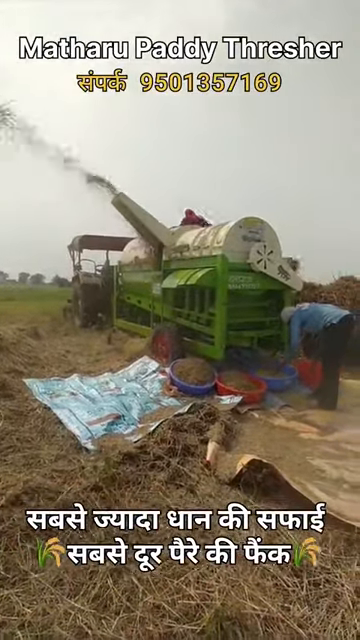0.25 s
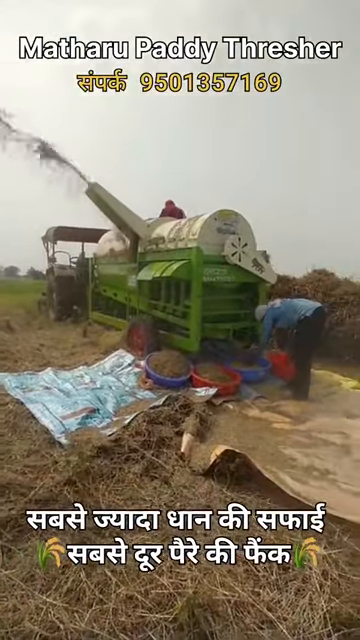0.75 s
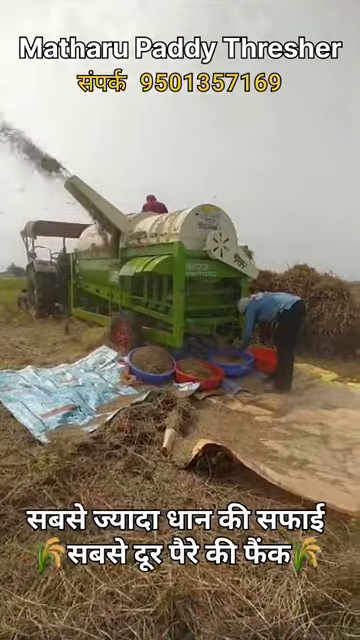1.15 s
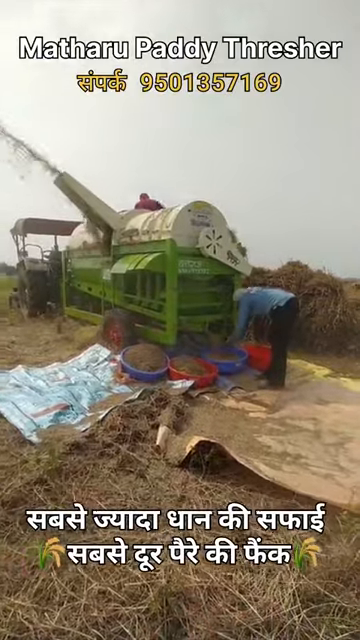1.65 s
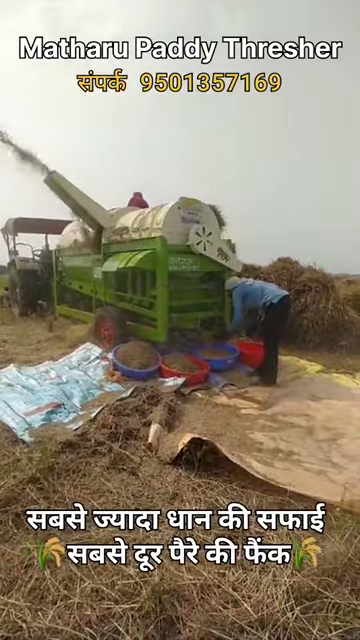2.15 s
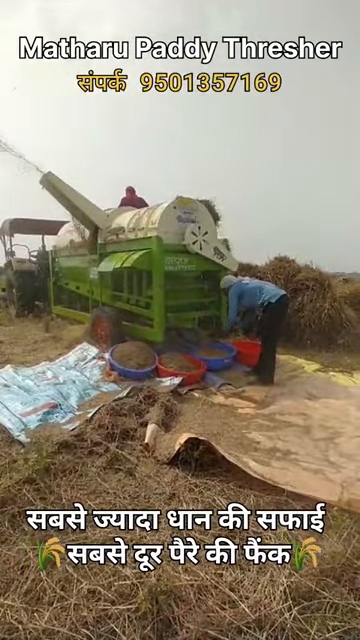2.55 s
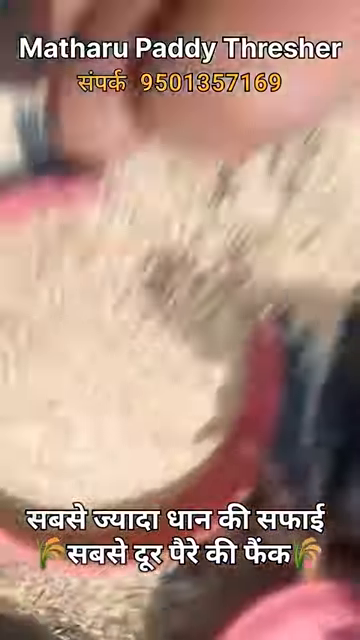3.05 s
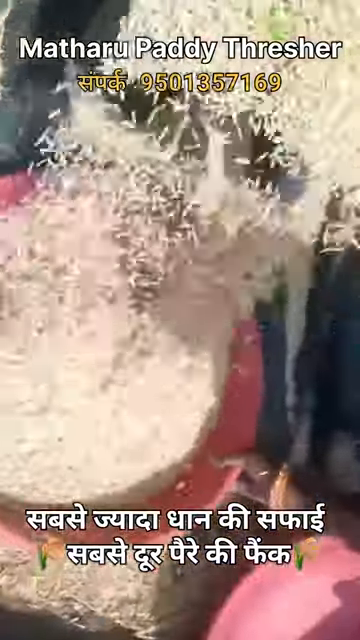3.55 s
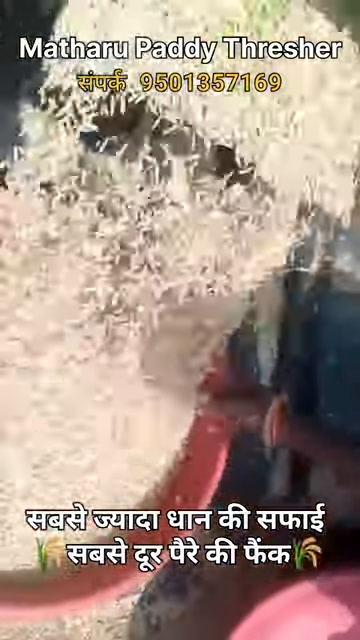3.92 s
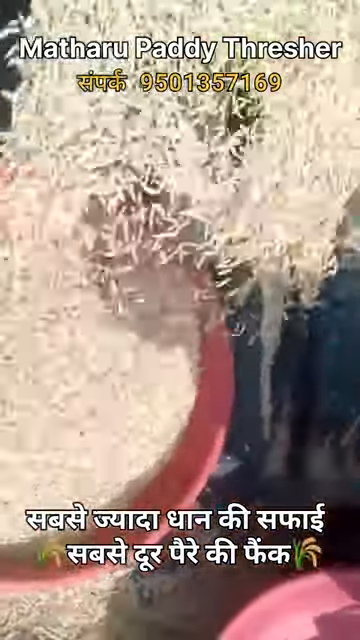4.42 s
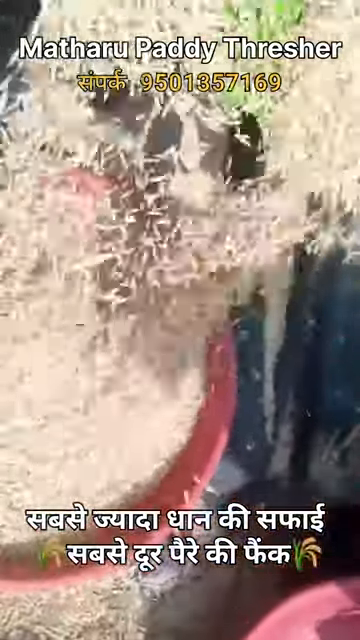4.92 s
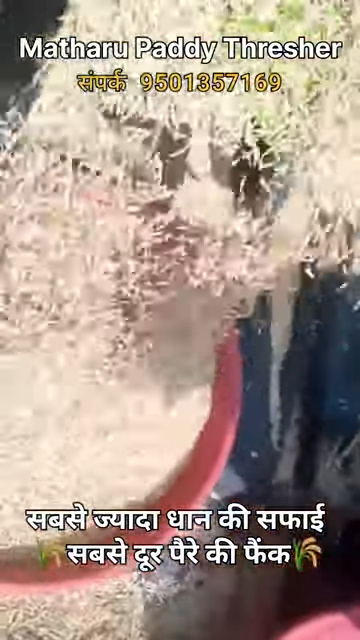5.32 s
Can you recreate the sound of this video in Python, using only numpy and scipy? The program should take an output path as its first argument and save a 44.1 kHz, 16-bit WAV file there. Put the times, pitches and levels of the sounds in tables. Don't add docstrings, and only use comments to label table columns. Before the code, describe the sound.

Loud steady farm machine roar with engine drone, metallic knocks and hiss for three seconds, then a sudden drop to soft sheet-metal rattle and grain hiss.

```python
import sys
import numpy as np
from scipy import signal
from scipy.fft import rfft, irfft
from scipy.io import wavfile
from scipy.ndimage import uniform_filter1d

SR = 44100
rng = np.random.default_rng(int(sys.argv[2]) if len(sys.argv) > 2 else 0)


def transcribe(u):
    v = np.clip(np.atleast_2d(u).T, -1, 1)
    q = np.round(v * 32767).astype(np.int16)
    wavfile.write(sys.argv[1], SR, q)


def voltage_ratio(decibels):
    exponent = np.asarray(decibels, float) / 20
    return 10 ** exponent


N = 246078
TIME_S = np.arange(N) / SR
CUT_S = 3.0243


def evened(x):
    return x / np.sqrt(np.mean(x ** 2) + 1e-20)


def curve(rows, col=1):
    rows = np.array(rows)
    return np.interp(TIME_S, rows[:, 0], rows[:, col])


def read(points, hz):
    f, value = np.transpose(points)
    return np.interp(np.log(hz + 1), np.log(f + 1), value)


def bumps(table, hz):
    return sum(db / (1 + (2 * (hz - f) / width) ** 2) for f, width, db in table)


def slow(hz):
    step = 64
    spectrum = rfft(rng.standard_normal(4096))
    spectrum = spectrum * np.exp(-(np.fft.rfftfreq(4096, step / SR) / hz) ** 2)
    return np.interp(np.arange(N) / step, np.arange(4096), evened(irfft(spectrum)))


def coloured(x, gain, patchy_db, flicker_db):
    hz, t, z = signal.stft(x, SR, nperseg=1024)
    patches = rng.standard_normal((len(t), len(hz))).T
    patches = uniform_filter1d(patches, size=12, axis=0)
    patches = evened(uniform_filter1d(patches, size=6, axis=1))
    flicker = rng.standard_normal(len(t))
    z = z * gain(hz)[:, None] * voltage_ratio(patchy_db * patches + flicker_db * flicker)
    return evened(signal.istft(z, SR, nperseg=1024)[1][:N])


def orders(turn_hz, table, waver_db, drift, waver_hz):
    angle = 2 * np.pi * np.cumsum(turn_hz) / SR
    out = np.zeros(N)
    for multiple, db in table:
        half_turns = round(2 * multiple)
        level = np.sqrt(2) * voltage_ratio(db + waver_db * slow(waver_hz))
        phase = 2 * np.pi * rng.random() + drift * slow(waver_hz)
        out += level * np.sin(half_turns / 2 * angle + phase)
    return out


# time_s, load_db (above the usual)
STRAW_LOAD = [
    (0.0, .3),
    (0.68, -1),
    (0.9, 0.9),
    (1.33, 1.2),
    (1.62, -1),
    (1.87, -2),
    (2.1, 0.25),
    (2.42, 1),
    (3.02, -1),
]


def loaded(level_db, share, gust_db):
    return voltage_ratio(level_db + share * curve(STRAW_LOAD) + gust_db * slow(3.9))


# time_s, crank_hz
CRANK_WIDE = [
    (0.0, 33.4),
    (1.67, 33.23),
    (2.33, 33.2),
    (2.5, 32.04),
    (3.02, 32.12),
]
# frequency_hz, level_db (per Hz)
ROAR_SPECTRUM = [(24, -50), (40, -33.5), (118, -12), (259, -13), (297, -9), (384, -11), (640, -7),
                 (860, -11), (1180, -14.5), (1490, -15.5), (2130, -17.5), (2340, -23), (2590, -15),
                 (3150, -18.5), (4400, -36.5), (5720, -56), (9680, -120)]
# frequency_hz, width_hz, gain_db
REFLECTIONS = [(124, 62, 3.5), (217, 50, 3.5), (256, 29, -2), (859, 88, -13.5), (1168, 30, 3),
               (1510, 165, -4), (1770, 30, 3.5), (1860, 58, -12.5), (2385, 120, -2.5), (2863, 230, -8.5),
               (3500, 150, -4.5)]


def roar():
    gain = lambda hz: voltage_ratio(read(ROAR_SPECTRUM, hz) + bumps(REFLECTIONS, hz))
    stroke = 1 + 0.032 * np.cos(np.pi / 2 * np.cumsum(curve(CRANK_WIDE)) / SR + 2.1)
    noise = coloured(rng.standard_normal(N), gain, patchy_db=0.96, flicker_db=0.63)
    return loaded(level_db=-28, share=0.85, gust_db=0.71) * stroke * noise


# multiple, level_db (rms)
CRANK_TONES = [(2, -40.5), (3, -36), (4, -34.5), (5, -38.5), (6, -46), (6.5, -46.5), (7, -42), (9, -45.5),
               (10, -46), (10.5, -49.5)]
BLOWER_TONES = [(2, -53), (3, -49), (4, -31.5), (5, -43), (6, -46.5), (7, -45.5), (8, -50.5), (12, -50.5)]


def drive():
    crank_hz = curve(CRANK_WIDE)
    blower_hz = 0.868 * crank_hz
    drone = orders(crank_hz, CRANK_TONES, waver_db=0.84, drift=0.45, waver_hz=7.1)
    drone += orders(blower_hz, BLOWER_TONES, waver_db=2.2, drift=0.52, waver_hz=5.7)
    return loaded(level_db=-0.29, share=-0.1, gust_db=0.51) * drone


# time_s, peak_db, low_db (low part relative to high)
ROD_KNOCKS = [(0.0548, -22, -5), (0.1506, -31, -9), (0.177, -27, 1), (0.3269, -25, -4), (0.5186, -34, 1),
              (0.7843, -22.5, 1), (0.8644, -31, 3), (0.907, -19, 0), (0.9976, -29, -8), (1.0295, -25, -14),
              (1.15, -23, 0.5), (1.272, -21.5, -2), (1.388, -24.5, -2), (1.509, -28, -1), (1.759, -31, 0),
              (1.9393, -27.5, -1), (1.9919, -23, -6), (2.1148, -25.5, -3), (2.358, -23, 1), (2.384, -28, 3),
              (2.4094, -34, 6), (2.7923, -34, -11), (2.95, -25, -12)]


def ringing(low_hz, high_hz, t):
    hz = rng.uniform(low_hz, high_hz, (40, 1))
    level = voltage_ratio(1.9 * rng.standard_normal(hz.shape))
    return evened((level * np.sin(2 * np.pi * (hz * t + rng.random(hz.shape)))).sum(0))


def clanks():
    out, t = np.zeros(N + 4000), np.arange(4000) / SR
    t60_s = 0.076
    for start_s, db, low_db in ROD_KNOCKS:
        shape = np.minimum(t / 0.01, 1) ** 2 * voltage_ratio(-60 * np.maximum(t - 0.009, 0) / t60_s)
        shape = shape + 0.046 * np.roll(shape, rng.integers(500, 1100))
        ring = ringing(5500, 7900, t) + voltage_ratio(low_db) * ringing(2600, 5500, t)
        start = max(round((start_s - 0.007) * SR), 0)
        out[start:][:len(t)] += voltage_ratio(db - 10) * shape * ring
    return out[:N]


# frequency_hz, level_db
PANEL_SPECTRUM = [(2120, -17), (3600, 0), (4140, -15), (4680, -2), (5330, -5.5), (6700, -1), (7500, -5.5),
                  (8230, -18), (9930, -26), (11000, -18), (14300, -50), (22000, -120)]


def clatter():
    strength = voltage_ratio(np.minimum(rng.exponential(1, N), 5))
    hits = strength * (rng.random(N) < 0.3) * rng.standard_normal(N)
    angle = 2 * np.pi * np.cumsum(curve(CRANK_WIDE)) / SR
    throb = 1 + 0.076 * np.cos(angle / 4 + 2.0) + 0.044 * np.cos(angle / 2 + 0.25)
    body = coloured(hits, lambda hz: voltage_ratio(read(PANEL_SPECTRUM, hz)), patchy_db=1.5, flicker_db=0.8)
    return loaded(level_db=-40, share=0.75, gust_db=0.37) * throb * body


# frequency_hz, level_db
CHAFF_SPECTRUM = [(5000, -8.5), (8500, -8), (10500, -10), (12600, -1.5), (13300, 0), (14900, -2.5),
                  (15600, -11.5)]


def chaff():
    hiss = coloured(rng.standard_normal(N), lambda hz: voltage_ratio(read(CHAFF_SPECTRUM, hz)),
                    patchy_db=1.3, flicker_db=0.5)
    return loaded(level_db=-40.5, share=0.5, gust_db=0.4) * hiss


# time_s, shaft_hz, rattle_db
OUTLET_SHAFT = [
    (3.03, 27.88, -47),
    (3.7, 28.51, -47.5),
    (4.15, 27.53, -48.2),
    (4.4, 28.02, -47.5),
    (4.8, 28.83, -47),
    (5.12, 28.86, -46.5),
    (5.58, 28.32, -47),
]
# frequency_hz, level_db (per Hz)
RATTLE_SPECTRUM = [(15, -65), (25, -28), (54, -9), (190, -11.5), (258, -6), (334, -9.5), (444, -6),
                   (589, -16), (1040, -13), (1340, -0.5), (1510, -7), (2260, -13.5), (3370, -24),
                   (4070, -20.5), (7000, -38), (9100, -66), (15400, -120)]
# frequency_hz, width_hz, gain_db
SHEET_PEAKS = [(1290, 280, 1), (2050, 350, 5.5), (2360, 63, 2.5), (2820, 55, 5), (3180, 400, 0),
               (3980, 270, 6), (5560, 330, 8.5)]
# frequency_hz, level_db (rms)
SHEET_MODES = [(1132, -59), (1158, -63), (1213, -59), (1242, -61), (1340, -60), (1446, -62), (1267, -59),
               (1305, -59), (1389, -53), (1507, -63), (1650, -64), (1825, -65), (2175, -68), (2285, -67),
               (2417, -71)]


def rattle():
    turns = np.cumsum(curve(OUTLET_SHAFT)) / SR
    fresh = rng.standard_normal((int(turns[-1]) + 2, 1560))
    pattern = signal.lfilter([1], [1, -0.65], fresh, axis=0)
    x = pattern[turns.astype(int), (turns % 1 * fresh.shape[1]).astype(int)]
    x = x * (1 + 0.1 * np.cos(2 * np.pi * turns + 1.14) + 0.033 * np.cos(4 * np.pi * turns + 2.1))
    gain = lambda hz: voltage_ratio(read(RATTLE_SPECTRUM, hz) + bumps(SHEET_PEAKS, hz))
    body = coloured(x, gain, patchy_db=1.1, flicker_db=0.3)
    rings = np.zeros(N)
    for hz, db in SHEET_MODES:
        level = voltage_ratio(db + 2.5 * slow(6))
        rings += level * np.sin(2 * np.pi * hz * TIME_S + 0.8 * slow(4))
    level_db = curve(OUTLET_SHAFT, col=2)
    return voltage_ratio(level_db + 5.0) * body + voltage_ratio(level_db + 49) * rings


# time_s, firing_hz
OUTLET_FIRING = [
    (3.03, 63.7),
    (4.32, 64.6),
    (4.54, 64.6),
    (4.65, 65.5),
    (5.47, 65.15),
    (5.58, 63.76),
]
# multiple, level_db (rms)
HUM_TONES = [(1, -74), (2, -52), (3, -60), (4, -63.5), (5, -69.5)]
OUTLET_SHAFT_TONES = [(2, -69), (3, -71), (8, -62)]


def hum():
    crank_hz = curve(OUTLET_FIRING) / 2
    out = orders(crank_hz, HUM_TONES, waver_db=0.5, drift=0.26, waver_hz=5.1)
    out += orders(curve(OUTLET_SHAFT), OUTLET_SHAFT_TONES, waver_db=3.0, drift=0.27, waver_hz=2.0)
    return out


# middle_s, half_length_s, level_db (rms)
DRUMMING_SWELLS = [
    (3.16, .04, -53),
    (3.45, 0.17, -52),
    (3.834, 0.07, -53),
    (4.196, .04, -58),
    (4.6, 0.17, -52.5),
    (4.953, 0.09, -61),
    (5.451, .15, -58),
]
# start_s, end_s, start_hz, end_hz, level_db (rms)
CHUTE_TONES = [
    (3.03, 3.498, 496, 501, -59),
    (3.3, 3.8, 392, 402, -65),
    (3.75, 4.5, 302.7, 304, -59),
    (3.86, 4.7, 439.3, 451, -56.5),
    (4.403, 5.3, 398, 405.5, -57.5),
    (4.651, 5.552, 376.3, 369.5, -59.5),
    (4.101, 4.6, 497, 499, -64),
    (5.15, 5.601, 316, 311.7, -66),
]


def chute():
    swell = voltage_ratio(-63.5)
    for middle_s, half_s, db in DRUMMING_SWELLS:
        swell = swell + voltage_ratio(db) * np.exp(-((TIME_S - middle_s) / half_s) ** 2)
    swell = swell * voltage_ratio(3.5 * slow(16))
    out = swell * np.sin(2 * np.pi * 9 * np.cumsum(curve(OUTLET_SHAFT)) / SR)
    for start_s, end_s, start_hz, end_hz, db in CHUTE_TONES:
        along = np.clip((TIME_S - start_s) / (end_s - start_s), 0, 1)
        hz = start_hz + (end_hz - start_hz) * along
        level = voltage_ratio(db + 1.2 * slow(6.6)) * np.sqrt(np.sin(np.pi * along).clip(0))
        out += level * np.sin(2 * np.pi * np.cumsum(hz) / SR)
    return np.sqrt(2) * out


# frequency_hz, level_db (rms)
FRAME_MODES = [(2707, -72), (2747, -71), (2913, -74), (3017, -73), (3182, -73), (3796, -73), (3997, -65.5),
               (4122, -72), (4907, -79), (5370, -79), (5477, -76), (5715, -77)]


def sieve_frame():
    out = np.zeros(N)
    for hz, db in FRAME_MODES:
        out += voltage_ratio(db + 4.4 * slow(9)) * np.sin(2 * np.pi * hz * TIME_S + 1.33 * slow(8.8))
    return out


# low_hz, high_hz, share (of time)
DROPOUTS = [(12400, 13000, .03), (13800, 14450, .16), (14500, 15100, .1)]


def holed(x):
    hz, t, z = signal.stft(x, SR, nperseg=1024)
    for low_hz, high_hz, share in DROPOUTS:
        gone = np.repeat(rng.random(len(t) // 2 + 1) < share, 2)[:len(t)]
        band = (hz > low_hz) & (hz < high_hz)
        z = z * np.where(band[:, None] & gone, voltage_ratio(-30), 1)
    return signal.istft(z, SR, nperseg=1024)[1][:N]


# frequency_hz, level_db
GRAIN_SPECTRUM = [(3530, -35), (6000, 1), (6530, -2.5), (8360, 2), (9690, -10), (11500, -11),
                  (14900, -11.5), (15600, -12)]


def grain():
    sieve = 1 + 0.03 * np.cos(2 * np.pi * 5.2 * TIME_S + 0.63)
    hiss = coloured(rng.standard_normal(N), lambda hz: voltage_ratio(read(GRAIN_SPECTRUM, hz)),
                    patchy_db=1.2, flicker_db=0.6)
    return voltage_ratio(-62.5) * sieve * holed(hiss)


# low_edge_hz, level_db
SIDE_LEVEL = [(4100, -49), (6300, -46), (8500, -60), (10300, -59), (12300, -50), (14000, -50)]


def side_bursts():
    size, count, moments = 1024, 26, 15
    out, hz = np.zeros(N), np.fft.rfftfreq(2 * size, 1 / SR)
    starts = 165 + size * rng.integers(2, int(CUT_S * SR / size) - 2, moments)
    for k, start in enumerate(starts[rng.integers(0, moments, count)]):
        low_hz = 4100 + (13800 - 4100) * np.sin(np.pi / 2 * k / count) ** 2
        band = (hz > low_hz) * (hz < low_hz + 1600)
        noise = irfft(rfft(rng.standard_normal(2 * size)) * band)
        out[start:][:2 * size] += voltage_ratio(read(SIDE_LEVEL, low_hz)) * evened(noise) * np.hanning(2 * size)
    return out


def scene():
    wide = roar() + drive() + clanks() + clatter() + chaff()
    near = rattle() + hum() + chute() + sieve_frame() + grain()
    wide = signal.sosfilt(signal.butter(3, 56, "high", fs=SR, output="sos"), wide)
    fade = np.clip((TIME_S - CUT_S) / 0.0016, 0, 1)
    mono = (1 - fade) * wide + fade * near
    return np.array([mono, mono])


def roll_off(x):
    return signal.sosfilt(signal.butter(12, 16060, fs=SR, output="sos"), x)


def record(dry):
    mix = dry + np.array([[1], [-1]]) * side_bursts()
    low_pass = signal.firwin(1023, 15520, window=("kaiser", 10), fs=SR)
    mix = signal.oaconvolve(mix, low_pass[None], "same")
    return roll_off(mix)


dry = scene()
out = record(dry)
transcribe(out)
```